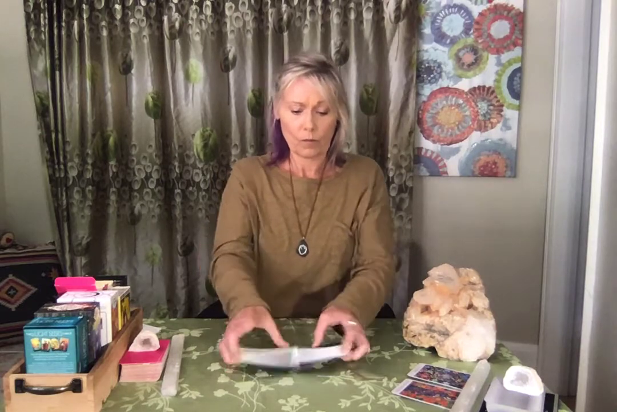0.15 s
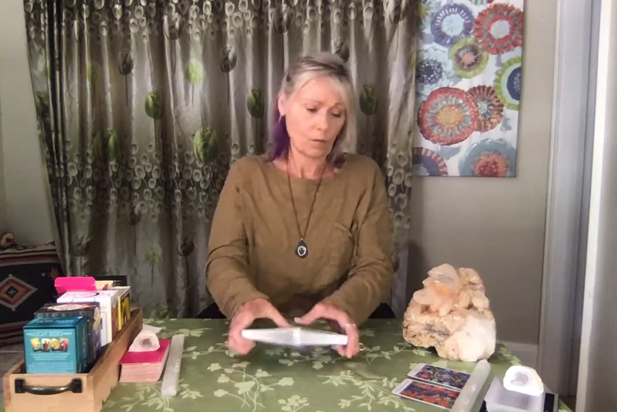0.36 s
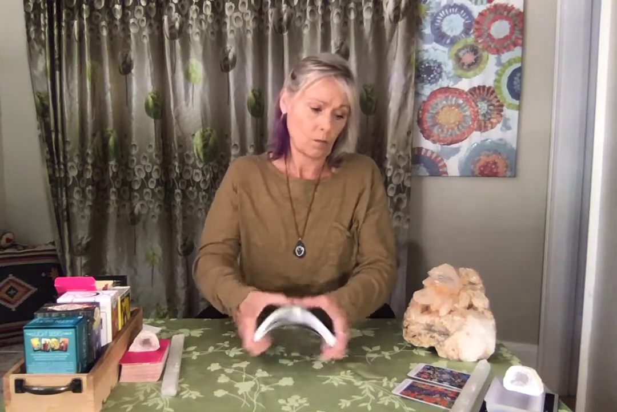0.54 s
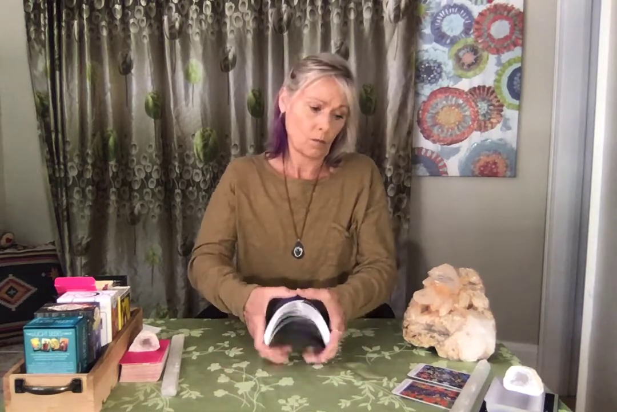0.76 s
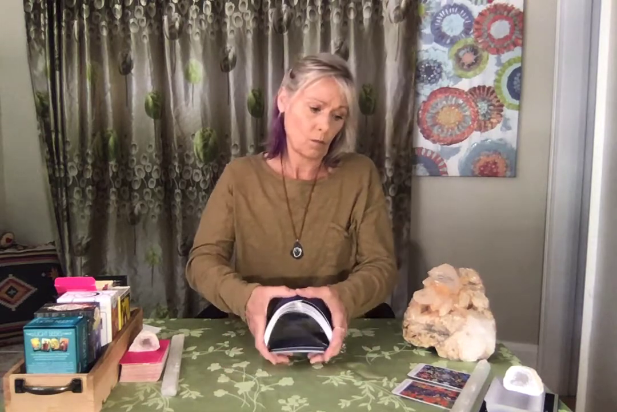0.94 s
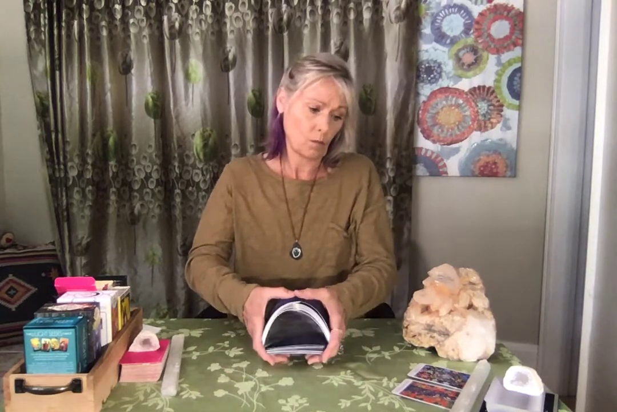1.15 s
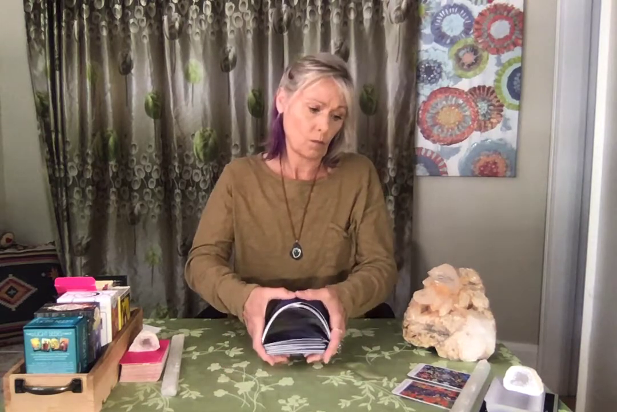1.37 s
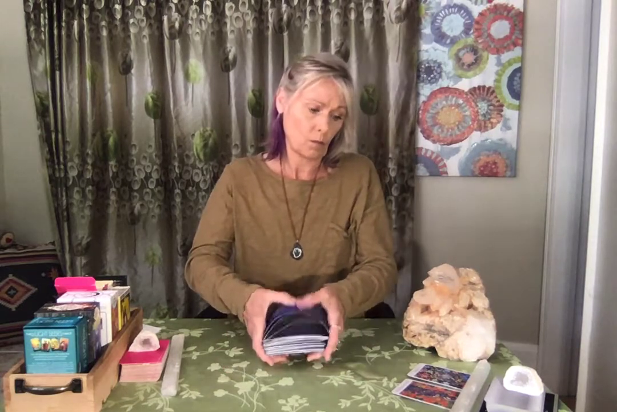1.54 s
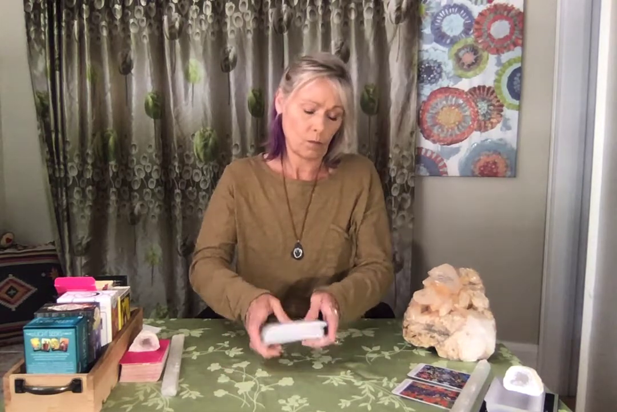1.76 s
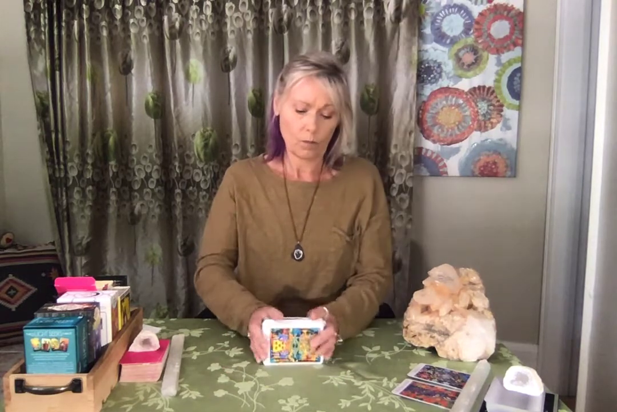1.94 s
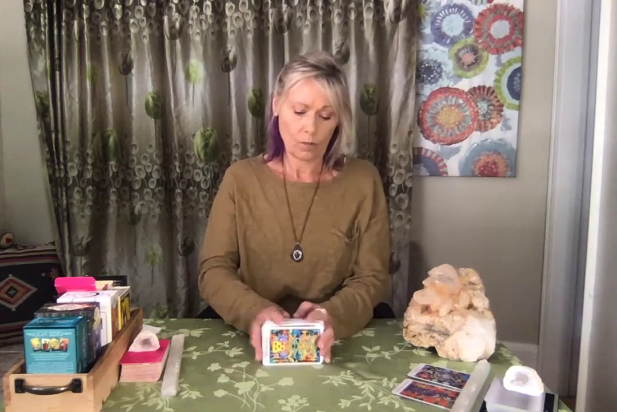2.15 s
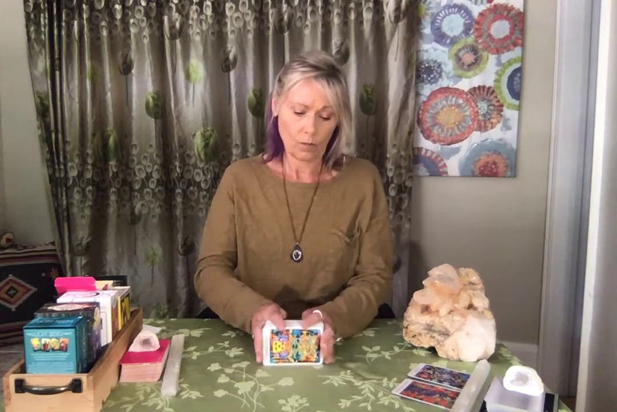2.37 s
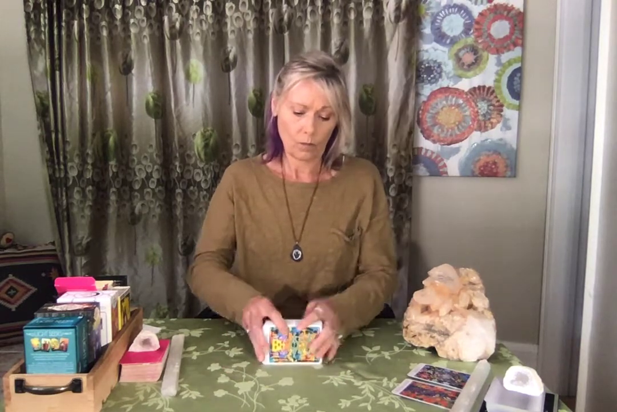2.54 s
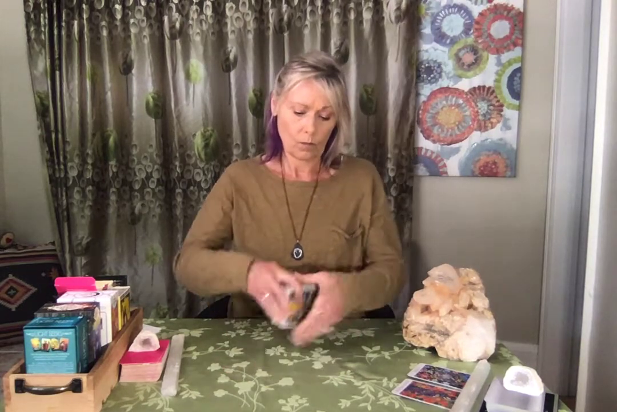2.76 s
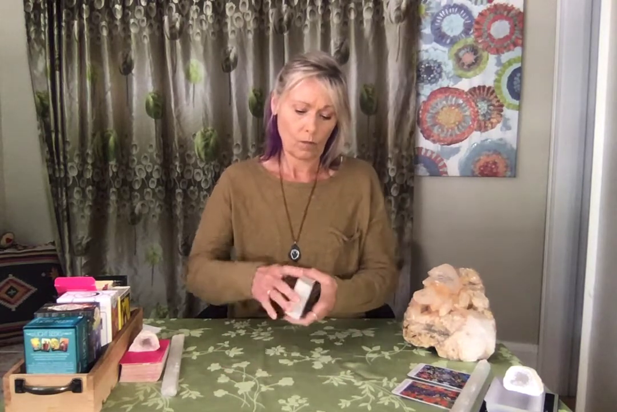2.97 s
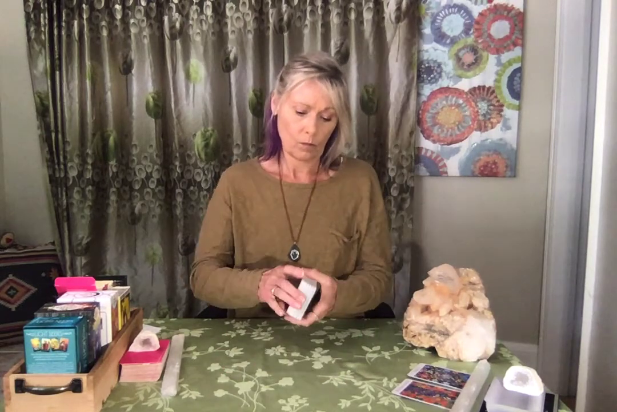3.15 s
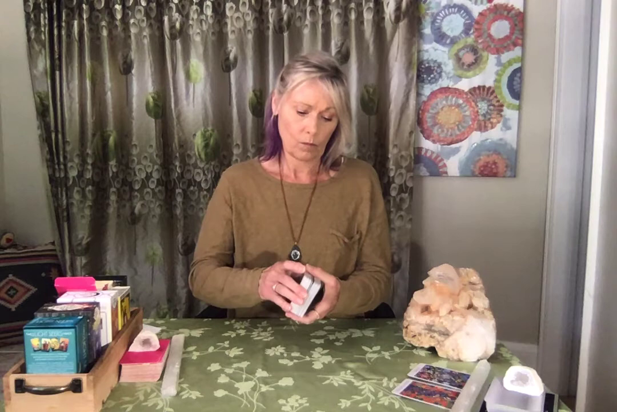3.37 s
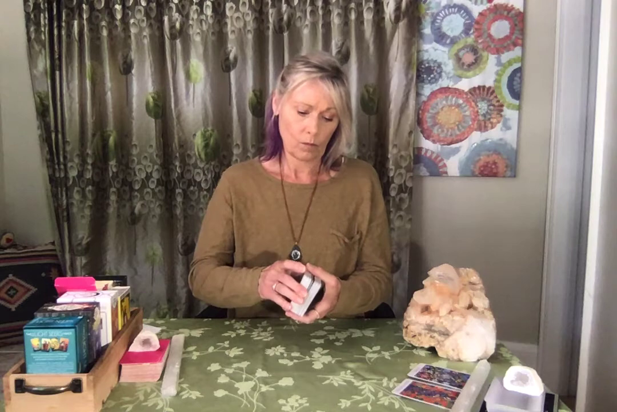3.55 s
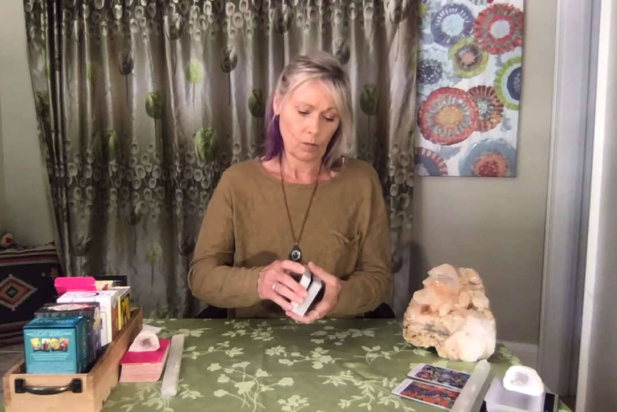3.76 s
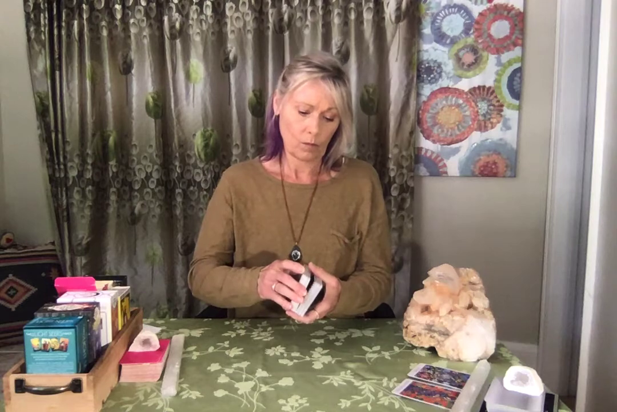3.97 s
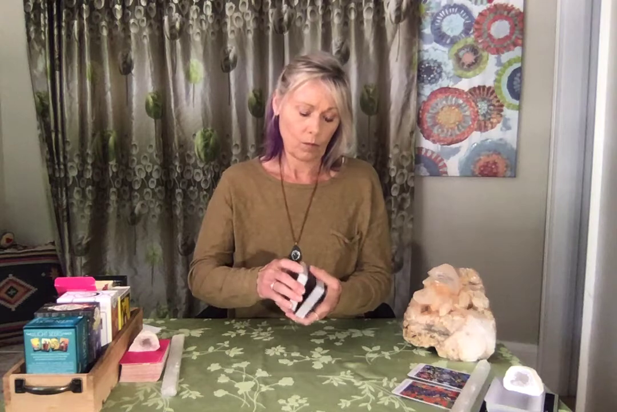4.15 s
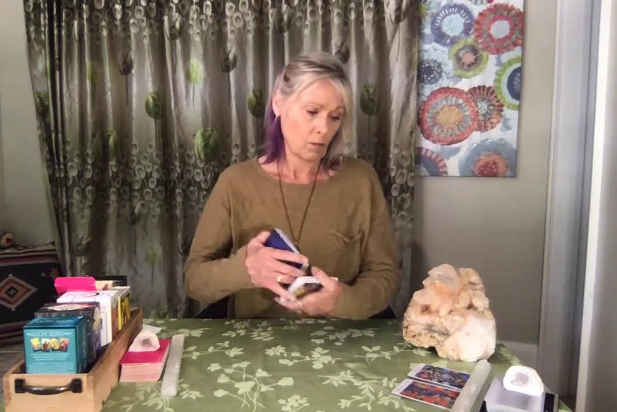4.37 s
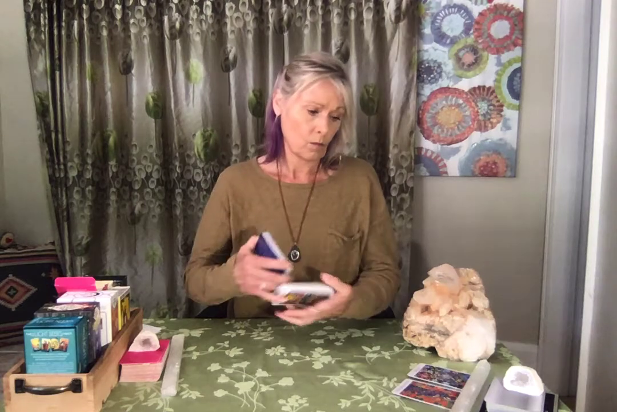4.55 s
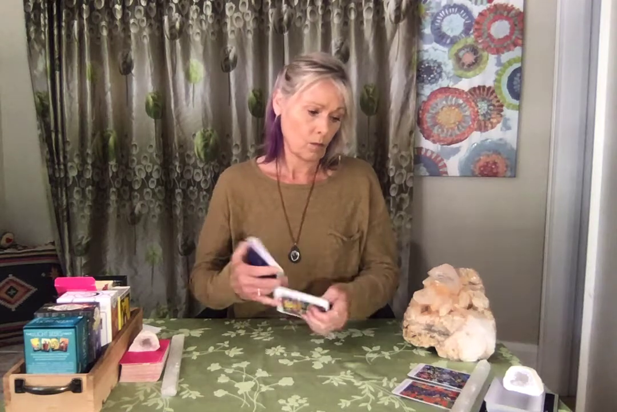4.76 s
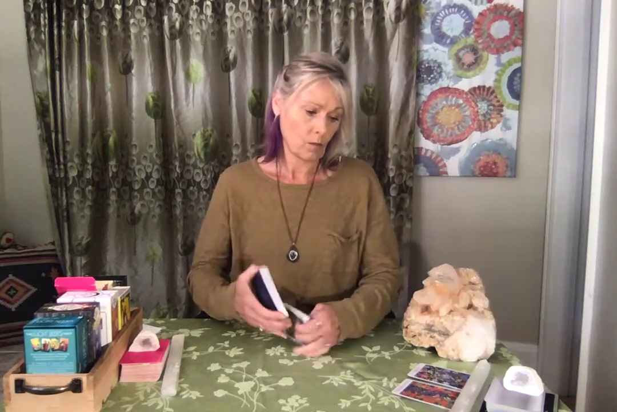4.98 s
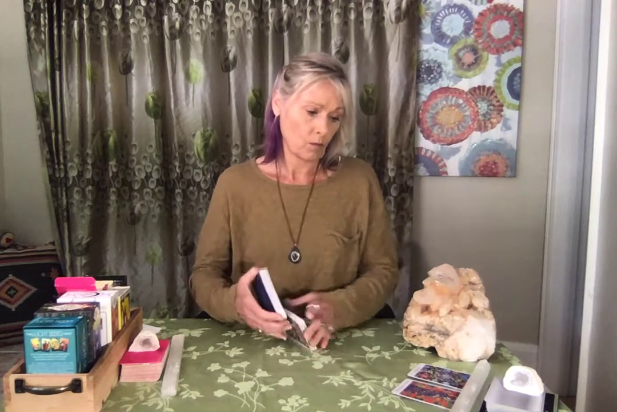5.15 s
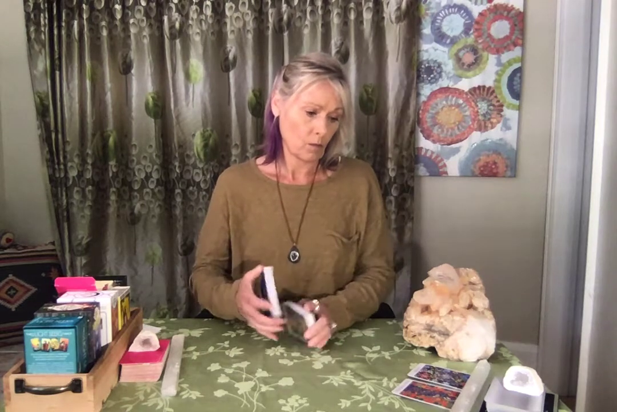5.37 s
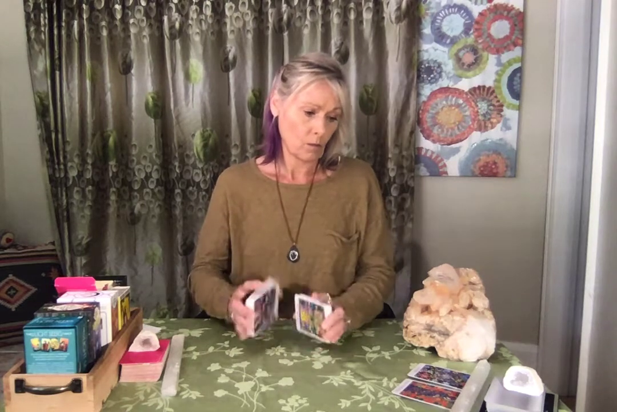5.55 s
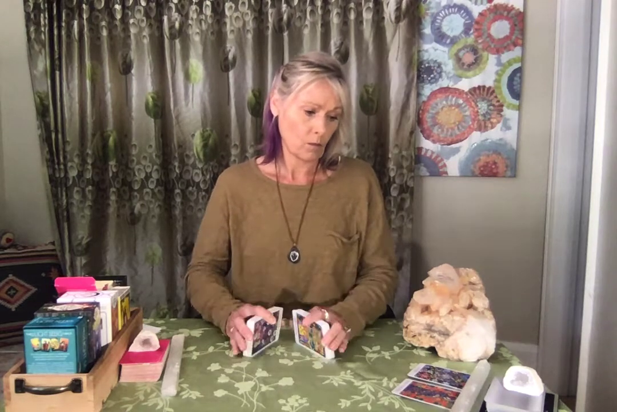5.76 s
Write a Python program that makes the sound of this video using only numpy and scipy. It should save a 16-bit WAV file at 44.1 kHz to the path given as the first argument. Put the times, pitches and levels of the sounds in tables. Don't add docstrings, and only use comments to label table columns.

```python
import sys
import numpy as np
from scipy import signal
from scipy.fft import rfft, irfft, next_fast_len
from scipy.io import wavfile

SR = 44100
rng = np.random.default_rng(int(sys.argv[2]) if len(sys.argv) > 2 else 0)


def convert_level_to_amplitude(level_db):
    exponent = np.asarray(level_db, float) / 20
    return 10 ** exponent


def generate_wav(signal):
    frames = np.transpose(np.atleast_2d(signal))
    scaled = np.clip(frames, -1, 1) * 32767
    pcm = np.round(scaled).astype(np.int16)
    wavfile.write(sys.argv[1], SR, pcm)


N = 256395


def rms_one(x):
    return x / np.sqrt(np.mean(x ** 2) + 1e-20)


def in_time(rows):
    s, *columns = np.transpose(rows)
    return [np.interp(np.arange(N) / SR, s, column) for column in columns]


def coloured(x, spectrum):
    size = next_fast_len(N + 8192)
    hz, level_db = np.transpose(spectrum)
    grid_hz = np.arange(4097) * SR / 8192 + 1
    log_gain = np.log(convert_level_to_amplitude(np.interp(np.log(grid_hz), np.log(hz), level_db)))
    cepstrum = irfft(log_gain)[:4097] * np.r_[1, 2 * np.ones(4095), 1]
    kernel = irfft(np.exp(rfft(cepstrum, 8192)))
    return rms_one(irfft(rfft(x, size) * rfft(kernel, size), size)[:N])


def drift(rate_hz):
    r = np.exp(-2 * np.pi * rate_hz / SR)
    wander = signal.lfilter([1], [1, -2 * r, r * r], rng.standard_normal(N + SR))
    return rms_one(wander[SR:])


def resonance(x, hz, width_hz):
    r = np.exp(-np.pi * width_hz / SR)
    turn = 2 * r * np.cos(2 * np.pi * hz / SR)
    return signal.lfilter(np.array([1, 0, -1]) * (1 - r * r) / 2, [1, -turn, r * r], x)


def ring(clicks, hz, t60_s):
    r, w = convert_level_to_amplitude(-60 / (t60_s * SR)), 2 * np.pi * hz / SR
    return signal.lfilter([0, np.sin(w)], [1, -2 * r * np.cos(w), r * r], clicks + 1e-18)


def clicks_at(times, level_db):
    out = np.zeros(N)
    out[np.round(times * SR).astype(int)] = convert_level_to_amplitude(level_db)
    return out


def soften(x, hz):
    r = np.exp(-2 * np.pi * hz / SR)
    return signal.lfilter([(1 - r) ** 2], [1, -2 * r, r * r], x)


def humps(times, level_db, fade_s, fall_to_rise, rounding):
    step = 32
    late_s = np.arange(0, N + step, step) / SR - np.reshape(times, (-1, 1))
    fades = np.abs(late_s) / np.reshape(fade_s, (-1, 1)) / np.where(late_s > 0, fall_to_rise, 1)
    swell_db = np.reshape(level_db, (-1, 1)) - 20 * fades ** rounding
    total = np.sqrt(np.sum(convert_level_to_amplitude(np.maximum(swell_db, -200)) ** 2, axis=0))
    return np.interp(np.arange(N) / step, np.arange(len(total)), total)


def sliding():
    # pitch_hz [Hz], level_db [dB per Hz]
    rub_colour = [(500, -13), (900, -5), (1300, -2.5), (2000, -11), (2900, -8.5), (3500, -12.5),
                  (4500, -14)]
    hiss_colour = [(2200, -16.5), (3200, -14), (4200, -5), (5500, -3.5), (7000, -1), (9500, 0.5),
                   (10800, -9), (12500, -23)]
    gloss_colour = [(8500, -21.5), (10000, 9), (11500, 6.5), (13000, 11.5), (15500, 7), (17000, -42.5)]
    rub_gain, hiss_gain, gloss_gain = slide_gains()
    catches = rng.standard_normal((3, N)) * convert_level_to_amplitude(.4 * rng.exponential(1, N))
    lone_corners = rng.random(N) < 140 / SR
    catches += lone_corners * rng.uniform(-8, 8, N)
    slips = (rng.random(N) < 120 / SR) * np.minimum(rng.exponential(1, N), 2)
    slip_db = signal.lfilter([1], [1, -np.exp(-1 / (0.0041 * SR))], slips)
    flutter_db = 1.7 * slip_db + 0.77 * drift(180) - 1.2
    rub = rub_gain * convert_level_to_amplitude(3.2 * drift(31) + 7.0) * coloured(catches[0], rub_colour)
    hiss = hiss_gain * convert_level_to_amplitude(1.35 * drift(19.5)) * coloured(catches[1], hiss_colour)
    gloss = gloss_gain * convert_level_to_amplitude(2.0 * drift(31)) * coloured(catches[2], gloss_colour)
    return convert_level_to_amplitude(flutter_db) * (rub + hiss + gloss)


def slide_gains():
    # time_s [s], slip speed as hiss_db [dB], pressure as rub_db [dB over hiss]
    bend = [
        (.385, -68, -1),
        (.44, -74, -4),
        (.503, -61, -9),
        (.545, -61, -0.5),
        (.58, -53.5, -8.5),
        (.658, -50, -14.5),
        (.675, -63.5, -6),
        (.702, -64.5, 0),
        (.745, -80, 0),
    ]
    # time_s [s], flow as hiss_db [dB], rub_db [dB over hiss]
    cascade = [
        (.748, -78, 0),
        (.769, -52, -18),
        (.816, -47, -20),
        (.96, -52, -11.5),
        (1.27, -51, -10),
        (1.53, -53, -12),
        (1.63, -46, -3),
        (1.66, -58, 4),
        (1.798, -87, -14),
    ]
    # time_s [s], hiss_db [dB], die_s [s to die 20 dB]
    bunch_table = [(.889, -47, .12), (.934, -49, .1), (.983, -45, .2), (1.007, -45.5, .2), (1.095, -51, .2),
                   (1.107, -47, .2), (1.178, -48, 0.14), (1.28, -46.5, .12), (1.335, -45, .12),
                   (1.392, -47, .1), (1.44, -44, .12), (1.558, -46, .06), (1.607, -44.5, .08)]
    # peak_s [s], hiss_db [dB],
    # fade_s [s to fade 20 dB], rub_db [dB over hiss], gloss_db [dB over hiss]
    stroke_table = [(0, -63.5, .09, 6, -10), (.1, -76, .2, 3, -6), (.185, -73, .025, 0, -12),
                    (.235, -68, .04, 0, -3), (.265, -57, .042, -2, 2), (.31, -73, .06, -3, -8),
                    (.358, -55.5, .043, -5, 0), (1.83, -69, .035, -1, -11), (1.87, -73, .08, 2, -6),
                    (1.924, -58.5, .038, -8, 1), (1.97, -77, .13, 4, -18), (2.192, -58, .05, -5, -5),
                    (2.235, -74, .07, -6, -4), (2.35, -82, .05, -3, -4), (2.5, -80, .16, -5, -14),
                    (2.592, -67.5, .055, -3, -16), (2.642, -74, .035, -10, 1), (2.862, -79, .04, 1, -10),
                    (2.89, -86, .04, -2, 4),
                    (4.44, -79, .08, -8, -2), (4.525, -74, .05, -3, -4), (4.6, -64, .09, -7, 1),
               (4.692, -72, .04, 3, -4), (4.73, -71, .045, -3, -3), (4.77, -70, .03, -3, -8),
               (4.797, -66, .04, -6, -10), (4.864, -74, .045, -6, -10), (4.95, -80, .03, -1, -16),
               (4.974, -69.5, .02, -1, -8), (5.02, -73, .05, -5, -1), (5.12, -84, .08, -4, -10),
               (5.31, -80, .13, 3, -6), (5.575, -65, .012, -3, -16), (5.59, -77, .04, -7, -8),
               (5.668, -76, .012, 0, 5), (5.688, -70, .04, 1, 0), (5.73, -84, .06, 0, -8)]

    s, hiss_db, fade_s, rub_db, gloss_db = np.transpose(stroke_table)
    strokes = [humps(s, hiss_db + part_db, fade_s, .9, 1.7) for part_db in (rub_db, 0, gloss_db)]
    power = np.array(strokes) ** 2

    s, hiss_db, die_s = np.transpose(bunch_table)
    rise_share = .15
    bunches = humps(s, hiss_db, rise_share * die_s, 1 / rise_share, 1)
    power += (convert_level_to_amplitude(np.array([[-13], [0], [3]])) * bunches) ** 2   # rub, hiss, gloss in dB
    power += convert_level_to_amplitude(-92) ** 2

    t = np.arange(N) / SR
    for curve, shine_db in ((bend, -7), (cascade, 1.0)):
        speed_db, press_db = in_time(curve)
        gloss_db = shine_db + .55 * (speed_db + 50)
        parts_db = speed_db + np.array([press_db, 0 * t, gloss_db])
        moving = (t > curve[0][0]) & (t < curve[-1][0])
        power += convert_level_to_amplitude(parts_db) ** 2 * moving
    return np.sqrt(power)


def cracks():
    # time_s [s], peak_db [dB], centre_hz [Hz]
    cascade_edges = [(.8486, -26, 11400), (.8875, -22, 9500), (.8973, -26, 9400), (.9333, -23, 9900),
                     (.9786, -20, 8900), (.9802, -23, 8400), (.9869, -28, 8300), (1.0854, -20, 8300),
                     (1.1071, -26, 7300), (1.1278, -29, 9100), (1.1329, -26, 10600), (1.1757, -30, 8800),
                     (1.1772, -20, 9600), (1.2283, -30, 9400), (1.2433, -31, 8900), (1.2479, -31, 10500),
                     (1.3739, -27, 11800), (1.4178, -30, 7400), (1.5332, -28, 11300), (1.535, -27, 9300),
                     (1.5565, -20, 5100), (1.5573, -23, 5200), (1.5586, -19, 8700), (1.5724, -22, 7900),
                     (1.6057, -23, 6300), (1.6428, -27, 10000)]
    # time_s [s], peak_db [dB]
    handling_ticks = [(.0953, -45), (.1033, -51), (1.8732, -50), (1.8863, -53), (2.8496, -52),
                      (4.6896, -48), (4.6945, -46), (4.9721, -52), (4.974, -52), (5.3404, -52),
                      (5.3424, -53), (5.5706, -48), (5.5757, -49), (5.5807, -54), (5.664, -55)]
    out, t = np.zeros(N), np.arange(256) / SR
    edges = [*cascade_edges] + [(s, peak_db, 7600) for s, peak_db in handling_ticks]
    edges += [(s + 0.001, peak_db - 8, 1.2 * hz) for s, peak_db, hz in edges]
    scatter = rng.standard_normal((len(edges), len(t)))
    lead = 3
    late_s = t - lead / SR
    for (s, peak_db, hz), grit in zip(edges, scatter):
        tick = -np.cos(2 * np.pi * hz * late_s) * np.exp(-(late_s * hz / 0.49) ** 2)
        tail = 0.18 * np.diff(grit, prepend=0) * np.exp(-t / 0.0014)
        start = round(s * SR) - lead
        out[start:start + len(t)] += convert_level_to_amplitude(peak_db + 3.5) * (tick + tail)
    return out


def slaps():
    # time_s [s], flap_db [dB], flap_hz [Hz], body_db
    # [dB]
    landings = [(.005, -51, 2300, -36.5), (0.8478, -49, 2860, -41), (.888, -38, 2220, -38),
                (.933, -36.5, 2370, -37.5), (0.9787, -31, 2290, -33), (1.0072, -35.5, 2050, -37),
                (1.0093, -37.5, 2430, -45), (1.0384, -45, 4390, -48), (1.0837, -47, 2530, -45.5),
                (1.107, -43, 3020, -50), (1.1263, -44, 2610, -45.5), (1.1312, -44, 2740, -45),
                (1.176, -44.5, 2460, -47), (1.199, -57.5, 2930, -42.5), (1.2205, -44.5, 2620, -41),
                (1.2426, -39.5, 2520, -33.5), (1.2927, -43.5, 2410, -43.5), (1.3366, -42, 2930, -42),
                (1.3939, -46, 2050, -28.5), (1.418, -42, 2570, -36), (1.432, -44, 3000, -42.5),
                (1.5325, -49.5, 2350, -41), (1.557, -28.5, 4470, -36.5), (1.5619, -33.5, 2000, -47),
                (1.5774, -32, 2360, -34), (1.5903, -47, 2200, -41.5), (1.6043, -36, 2350, -34),
                (1.616, -38.5, 1810, -43), (1.627, -42, 2500, -35), (1.6413, -38, 4000, -41.5)]
    # time_s [s], puff_db [dB over body_db]
    trapped_air = [
        (.85, -5),
        (.89, 4.5),
        (1.25, 4.5),
        (1.39, -24.5),
        (1.555, -24.5),
        (1.575, -3),
    ]
    s, flap_db, flap_hz, body_db = np.transpose(landings)
    air_db = np.interp(s, *np.transpose(trapped_air))
    ring_db = body_db - .3 * np.maximum(air_db, 0)
    puff_db = body_db + air_db
    flap, t = np.zeros(N), np.arange(600) / SR
    for at, level_db, hz in zip(np.round(s * SR).astype(int), flap_db, flap_hz):
        w = 2 * np.pi * hz
        overtones = np.sin(w * t) + 0.39 * np.sin(1.5 * w * t) + 0.47 * np.sin(0.688 * w * t)
        flap[at:at + len(t)] += convert_level_to_amplitude(level_db + 2.5 - 60 * t / 0.011) * overtones
    struck = ring(soften(clicks_at(s, ring_db + 4.5), 1190), 1275, 0.025)
    hollow = 0.29 * struck + 1.11 * resonance(struck, 1266, 100)
    air = soften(clicks_at(s, puff_db + 3.0), 600)
    puff = 0.78 * ring(air, 830, .035) - ring(air, 379, 0.016)
    return flap + hollow + puff


def knocks():
    # time_s [s], low_db [dB], high_db [dB], highest_db [dB]
    blows = [(1.915, -49, -46, -46.5), (1.921, -55, -40, -50), (1.932, -44, -43, -58),
             (4.9678, -33.5, -37, -49.5), (4.9993, -40, -67, -51), (5.021, -61, -48.5, -61),
             (5.029, -40, -59, -52), (5.046, -41.5, -63, -70), (5.104, -51, -65, -79),
             (5.6622, -47, -38.5, -52), (5.6666, -55, -32.5, -49), (5.6719, -41, -33.5, -68),
             (5.686, -51, -45, -46), (5.690, -33, -34, -50), (5.707, -36.5, -40, -45)]
    # pitch_hz [Hz], level_db [dB], t60_s [s]
    table_low = [(129.7, -5, 0.23), (159, -5.5, 0.2), (219.3, 0, 0.14), (253.6, -8, 0.14)]
    table_high = [(330, -35, 0.1), (389, -11.5, 0.14), (409, 0, 0.082), (448, -37, 0.066)]
    table_highest = [(530, -2, 0.041), (699, -0.5, 0.092), (920, -5, 0.031), (1040, -3, 0.038)]
    s, low_db, high_db, highest_db = np.transpose(blows)
    out = np.zeros(N)
    parts = ((table_low, low_db, 350), (table_high, high_db, 800), (table_highest, highest_db, 1500))
    for modes, blow_db, cloth_hz in parts:
        for hz, level_db, t60_s in modes:
            uneven_db = rng.normal(0, 1, len(s))
            push = soften(clicks_at(s, blow_db + level_db + uneven_db), cloth_hz)
            out -= ring(push, hz, t60_s)
    return out


def table_reflection(cards):
    # pitch_hz [Hz], width_hz [Hz], depth [0-1]
    notches = [(3500, 500, .4), (5300, 400, .5), (9350, 350, .45), (10750, 350, .55), (12200, 300, .7),
               (13600, 400, .92)]
    for hz, width_hz, depth in notches:
        cards = cards - np.clip(depth, 0, 1) * resonance(cards, hz, width_hz)
    return cards


def room(x):
    t = np.arange(int(.4 * SR)) / SR
    t60_s, level_db, dull_hz = 0.31, -14, 4700
    tail = soften(rng.standard_normal(len(t)), dull_hz) * convert_level_to_amplitude(-60 * t / t60_s)
    tail *= t > .004
    return convert_level_to_amplitude(level_db) * signal.fftconvolve(x, tail / np.sqrt(np.sum(tail ** 2)))[:N]


def background():
    # pitch_hz [Hz], level_db [dB per Hz]
    fan_colour = [(40, -21), (90, -15.5), (125, -9.5), (300, -12.5), (440, -21), (500, -20), (1000, -18),
                  (1400, -18), (1900, -29.5), (2800, -34), (3500, -39.5), (5500, -47), (9000, -53),
                  (15900, -59.5)]
    # pitch_hz [Hz], width_hz [Hz], level_db [dB]
    fan_tones = [(111.6, 17, -61), (151.2, 8.4, -71.5), (222.7, 8.1, -67.5), (430.3, 68, -66.5),
                 (1245, 190, -65)]
    # time_s [s], level_db [dB], fade_s [s to fade 20 dB]
    shoves = [(.34, -58, 1.2), (1.33, -63, 1), (1.99, -52.5, 0.1), (2.3, -51.5, 0.2), (2.5, -56, 0.2),
              (3.4, -62, .6), (4.18, -68, 0), (4.56, -72, 0.5), (5.1, -54, .35), (5.81, -58, 1)]
    mains_hz, mains_phase = 60, 2.57
    hum = np.sin(2 * np.pi * mains_hz * np.arange(N) / SR + mains_phase)
    mains = np.sqrt(2) * convert_level_to_amplitude(-50 + .5 * drift(0.83)) * hum
    fan = convert_level_to_amplitude(-55 + 0.1 * drift(2.5)) * coloured(rng.standard_normal(N), fan_colour)
    for hz, width_hz, level_db in fan_tones:
        tone = resonance(resonance(rng.standard_normal(N), hz, width_hz), hz, width_hz)
        fan += convert_level_to_amplitude(level_db) * rms_one(tone)
    rumble = rms_one(resonance(resonance(rng.standard_normal(N), 25, 12), 25, 12))
    shaking = humps(*np.transpose(shoves), fall_to_rise=1.3, rounding=1.2)
    return mains + fan + (convert_level_to_amplitude(-78.5) + shaking) * rumble


def scene():
    cards = table_reflection(sliding() + cracks() + slaps())
    near = cards + knocks()
    return (near + room(near) + background())[None]


def band_limit(x):
    return signal.sosfilt(signal.butter(12, 15980, fs=SR, output="sos"), x)


def record(dry):
    cutoff_hz = 16020
    top_cut = signal.cheby2(20, 50, cutoff_hz, fs=SR, output="sos")
    mix = signal.sosfilt(top_cut, dry)
    return band_limit(mix)


dry = scene()
out = record(dry)
generate_wav(out)
```